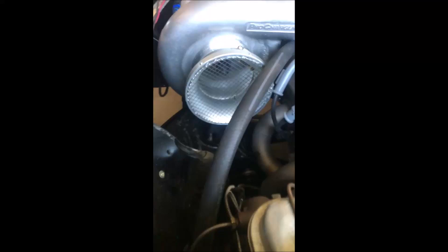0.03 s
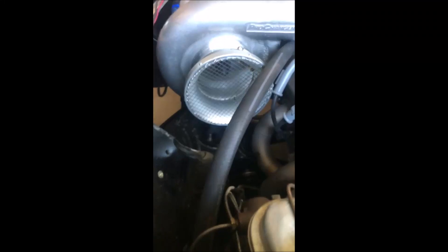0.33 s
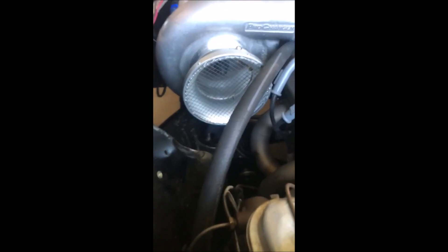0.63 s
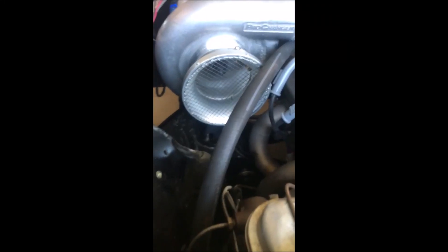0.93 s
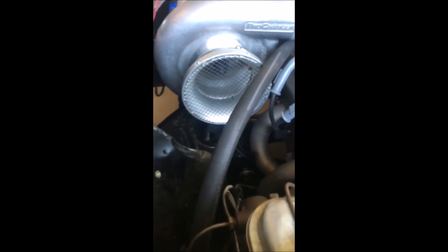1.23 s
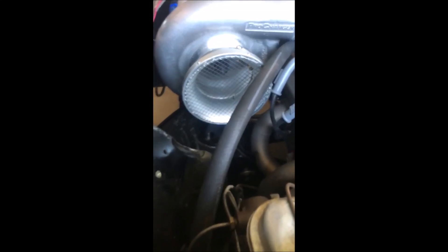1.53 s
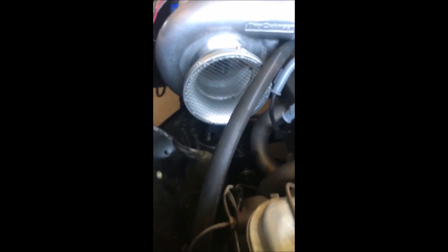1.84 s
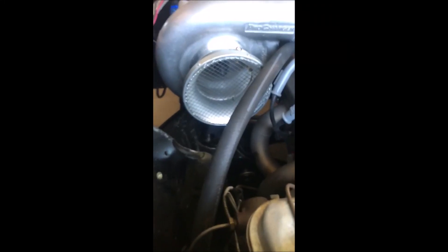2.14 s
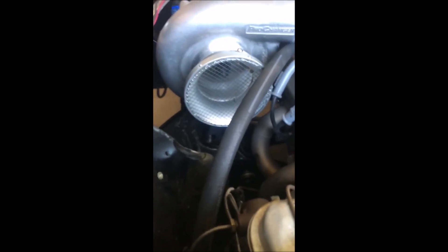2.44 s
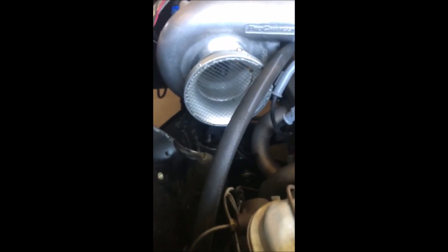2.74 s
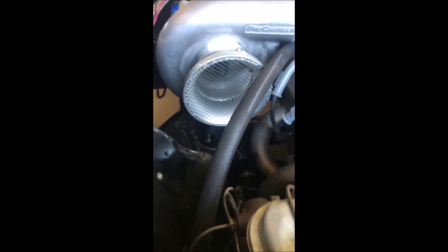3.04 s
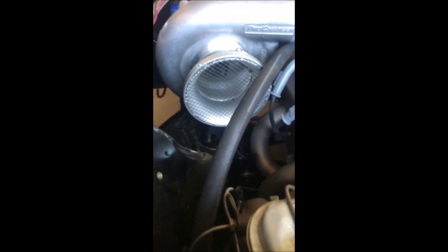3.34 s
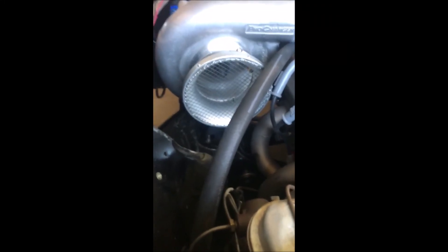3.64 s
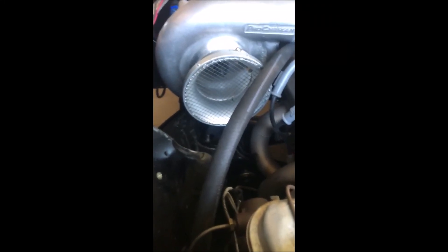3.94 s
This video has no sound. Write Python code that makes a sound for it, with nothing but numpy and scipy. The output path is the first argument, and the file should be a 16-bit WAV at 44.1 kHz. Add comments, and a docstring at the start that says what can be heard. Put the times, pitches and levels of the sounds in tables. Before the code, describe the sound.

A supercharged car engine idles loudly, heard from close by in the engine bay. A high gear whine flutters with rapid, irregular chirps over a lumpy low exhaust drone, with steady intake hiss and faint ticking throughout.

```python
"""A supercharged engine idles unevenly, heard from close by in the engine bay.
The exhaust booms at the firing rate. The supercharger's gears whine at a fixed multiple of it
and chirp each time the lumpy idle snatches at them; the intake hisses and the valves tick."""
import sys
import numpy as np
from scipy import signal
from scipy.fft import rfft, irfft
from scipy.io import wavfile

SR = 44100
rng = np.random.default_rng(int(sys.argv[2]) if len(sys.argv) > 2 else 0)


def persist_wave(psi):
    """Save psi, clipped to +-1, as 16-bit WAV."""
    counts = np.round(np.clip(psi, -1, 1) * 32767).astype(np.int16)
    wavfile.write(sys.argv[1], SR, np.atleast_2d(counts).T)


N = 176400

START_S = .162  # fixed
# (s, firing rate Hz)
SPEED = [(0.17, 92.0), (0.43, 92.4), (0.47, 90.0), (0.55, 93.5), (0.63, 91.8), (0.67, 95.6), (0.73, 93.0),
         (0.89, 92.0), (1.03, 93.7), (1.15, 89.0), (1.25, 93.9), (1.41, 88.9), (1.53, 93.6), (1.73, 92.2),
         (1.85, 89.2), (1.87, 92.1), (1.99, 90.9), (2.03, 86.7), (2.09, 92.4), (2.11, 90.0), (2.25, 92.9),
         (2.31, 88.8), (2.39, 93.5), (2.48, 91.8), (2.66, 94.6), (2.7, 91.7), (2.9, 93.3), (3.0, 93.1),
         (3.06, 90.2), (3.2, 93.2), (3.38, 89.7), (3.48, 93.7), (3.6, 90.9), (3.62, 93.0), (3.8, 90.8), (3.9, 93.2),
         (3.94, 89.1), (4.0, 91.2)]  # fixed
# gear chirps (s at the middle, peak dB)
CHIRPS = [(.176, -11), (.197, -10), (.23, -6.5), (.252, -6), (.277, -10), (.362, -4), (.416, -12), (.437, -6), (.467, -10),
          (.498, -6), (.516, -8), (.532, -4.5), (.638, -7), (.663, -12), (.7, -10), (.728, -8), (.757, -8), (.777, -7), (.798, -8),
          (.848, -11), (.898, -8), (.968, -6), (.994, -6), (1.009, -7), (1.034, -6.5), (1.053, -10), (1.158, -5.5), (1.171, -9),
          (1.232, -5), (1.258, -6), (1.273, -6), (1.365, -11), (1.409, -7), (1.441, -4), (1.51, -5.5), (1.587, -10),
          (1.651, -10), (1.669, -8), (1.716, -8), (1.738, -4), (1.795, -11), (1.82, -5), (1.846, -6), (1.858, -8), (1.912, -10),
          (1.954, -11), (1.978, -8), (1.993, -5), (2.039, -5), (2.073, -6), (2.095, -5.5), (2.156, -9), (2.177, -6), (2.194, -7),
          (2.277, -9), (2.337, -10), (2.382, -6), (2.406, -10), (2.426, -8.5), (2.447, -9), (2.494, -7), (2.528, -6.5), (2.549, -5),
          (2.608, -12), (2.66, -10), (2.726, -8), (2.745, -7), (2.76, -5), (2.796, -7), (2.823, -5), (2.886, -11), (2.938, -11),
          (2.96, -7), (2.986, -6), (3.09, -11), (3.16, -5), (3.203, -10), (3.226, -5.5), (3.292, -8), (3.35, -8), (3.426, -9),
          (3.464, -5), (3.491, -9), (3.51, -10), (3.563, -11), (3.609, -4), (3.629, -7), (3.685, -10), (3.733, -7), (3.756, -6),
          (3.779, -9), (3.827, -10), (3.873, -10), (3.959, -11)]  # fixed
CYLINDERS, MESH_ORDER = 8, 26  # fixed
BOOM_DB, BOOM_SHAKE = -10.5, 0.16
CHIRP_DB, CHIRP_SCATTER_HZ, CHIRP_GLIDE_HZ_PER_S, CHIRP_SKEW = .3, 20, 7500, .9  # fixed
# overtones of a chirp at full strength (multiple of the mesh tone, dB)
OVERTONES = [(2, -25.5), (3, -21), (4, -31.5)]
WHINE_DB, WHINE_JITTER_HZ, WHINE_FLUTTER_DB = -17.5, 24, 5.5  # fixed
# ringing of the housing and its brackets (Hz, width Hz, dB rms, share that follows the chirps 0-1)
HOUSING = [(407.8, 14, -38, 0.4), (880, 49, -40.5, 0.13), (1672.5, 87, -38, 0), (2058, 6.8, -38.5, 0.1), (3620, 76, -41, 0.18), (4807, 20, -37, 0.22), (5973, 92, -34, 0.18), (7175, 99, -36.5, .55), (7430, 70, -42, 0.87), (8205, 860, -36.5, 0.46)]
# engine block and exhaust pulses (Hz, dB per Hz)
BLOCK = [(20, -16.5), (38, -7), (48, -12), (60, -0.5), (100, -6), (148, 0.5), (168, -7.5), (186, -2), (235, -12.5), (275, -8), (345, -10.5), (400, -8.5), (480, -22.5), (900, -24.5), (2000, -61.5)]
BLOCK_DB, BLOCK_UNEVEN, BLOCK_NOISE = -25, 0.55, 2.32
# intake and belt hiss (Hz, dB per Hz)
HISS = [(100, -12), (450, -2.5), (800, 0.5), (1150, -3), (1600, -1), (1930, -3.5), (2270, 7), (2540, 5.5), (2670, -16), (2790, -15.5), (2890, -3.5), (3700, -4.5), (4500, -6.5), (5150, -10), (5700, -4), (6600, -6.5), (7200, -3.5), (7700, -15), (8300, -1), (9300, -18.5)]
HISS_DB, HISS_PULSING, HISS_FLUTTER_DB = -24, 0.038, 1.85
TICK_DB, TICK_SPREAD_DB, TICK_DECAY_S = -38, 3, .002  # fixed
CUTOFF_HZ = 9550  # fixed
# weak and strong firings (s, change of the boom dB)
STUMBLES = [(0.36, -6), (0.49, -5), (0.621, -5), (.705, 1.5), (0.8, -3), (1.14, -6.5), (1.225, -6), (1.44, -4), (1.79, -5), (2.05, -8), (2.28, 0), (2.72, -7), (3.07, -1.5), (3.27, -3.5)]
STUMBLE_S, IDLE_HZ = 0.021, 92.37
# exhaust boom (multiple of the engine cycle, dB)
ORDERS = [(7, -19.5), (8, 0), (11, -26.5), (13, -20), (16, -24.5)]
BOOM_DB_PER_HZ, BLOCK_DB_PER_HZ = .65, .7  # fixed
CEILING = .93  # fixed
CHIRP_S, CHIRP_S_PER_DB, CHIRP_LENGTH_SPREAD = .0062, -.0006, .15  # fixed
BACKLASH_S, BACKLASH_DB, TOOTH_CHATTER = .002, -8, .12  # fixed
RING_WAVER, RING_FLUTTER_DB = .004, 3  # fixed
# rasp of the teeth during a chirp (Hz, dB per Hz)
RASP = [(2800, -31), (3500, -6.5), (5100, -8.5), (6300, -2), (7700, -11), (8400, 6.5), (9300, 0.5)]
RASP_DB = -34
# lulls in which the gears run slack and the whine sinks (s at the middle, half length s)
LULLS = [(.58, .05), (1.11, .03), (1.2, .02), (2.695, .018)]  # fixed


def amp(db):
    """Decibels to gain."""
    return 10 ** (np.asarray(db) / 20)


def unit(x):
    """Scales to rms 1."""
    return x / np.sqrt(np.mean(x ** 2) + 1e-20)


def curve(points):
    """Joins (s, value) rows by straight lines."""
    return np.interp(np.arange(N) / SR, *np.transpose(points))


def add(mix, s, sound):
    """Adds a sound to the mix at a time."""
    part = mix[max(round(s * SR), 0):][:len(sound)]
    part += sound[:len(part)]


def colour(x, points):
    """Causal filter with the given (Hz, dB) shape; rms 1."""
    hz, db = np.transpose(points)
    log_gain = np.log(amp(np.interp(np.log(abs(np.fft.fftfreq(N, 1 / SR)) + 1), np.log(hz), db)))
    return unit(np.fft.ifft(np.fft.fft(x) * np.exp(signal.hilbert(log_gain).conj())).real)


def wander(hz):
    """Smooth random motion up to about the given rate; rms 1."""
    return unit(irfft(rfft(rng.standard_normal(N)) / (1 + (np.fft.rfftfreq(N, 1 / SR) / hz) ** 4), N))


def resonate(x, hz, width_hz):
    """A steep resonance at a fixed or moving pitch; rms 1."""
    turn, r = np.exp(2j * np.pi * np.cumsum(hz * np.ones(N)) / SR), np.exp(-np.pi * width_hz / SR)
    return unit((turn * signal.lfilter([(1 - r) ** 2], [1, -2 * r, r * r], x / turn)).real)


def firings(turns):
    """Sample positions at which a cylinder fires."""
    return np.flatnonzero(np.diff(np.floor(turns)) > 0)


def exhaust(turns, firing_hz):
    """A boom on a few engine orders and uneven firing pulses through the block, both stronger as the speed rises."""
    t, surge = np.arange(N) / SR, firing_hz - IDLE_HZ
    dips = sum(db * np.exp(-((t - s) / STUMBLE_S) ** 2) for s, db in STUMBLES)
    boom = sum(amp(db) * np.sin(2 * np.pi * (round(k) * turns / CYLINDERS + rng.random())) for k, db in ORDERS)
    boom = boom * amp(BOOM_DB + BOOM_DB_PER_HZ * surge + dips) * (1 + BOOM_SHAKE * wander(hz=24))
    at, pulses = firings(turns), np.zeros(N)
    pulses[at] = 1 + BLOCK_UNEVEN * rng.standard_normal(N)[:len(at)]
    block = colour(unit(pulses) + BLOCK_NOISE * rng.standard_normal(N), BLOCK)
    return boom + block * amp(BLOCK_DB + BLOCK_DB_PER_HZ * surge)


def chirps():
    """The gear teeth part, then strike: the mesh tone swells and bends upwards, briefer the harder the blow.
    Returns the swell, the bend in Hz and the slack before each blow."""
    swell, bend, slack = np.zeros((3, N))
    for (s, db), (detune, stretch) in zip(CHIRPS, rng.standard_normal((len(CHIRPS), 2))):
        length = (CHIRP_S + CHIRP_S_PER_DB * db) * np.exp(CHIRP_LENGTH_SPREAD * stretch)
        t = np.arange(-length, length, 1 / SR)
        shape = np.sin(np.pi * np.linspace(0, 1, len(t)) ** CHIRP_SKEW) ** 2
        add(swell, s - length, amp(db + CHIRP_DB) * shape)
        add(bend, s - length, np.sqrt(shape) * (CHIRP_SCATTER_HZ * detune + CHIRP_GLIDE_HZ_PER_S * t))
        add(slack, s - length - BACKLASH_S, shape)
    return swell, bend, slack


def supercharger(firing_hz):
    """One gear-mesh tone, fluttering between the chirps, brighter and raspier within them; the housing rings harder under load."""
    swell, bend, slack = chirps()
    slack = slack + sum(np.clip(2 - 2 * abs(np.arange(N) / SR - s) / half, 0, 1) for s, half in LULLS)
    running = amp(WHINE_DB + BACKLASH_DB * slack) * unit(amp(WHINE_FLUTTER_DB * np.minimum(wander(hz=87), 1)))
    level = np.hypot(swell, running)
    jitter = WHINE_JITTER_HZ * wander(hz=81.3) * np.sqrt(running / level)
    level = level * (1 + TOOTH_CHATTER * wander(hz=156))
    angle = 2 * np.pi * np.cumsum(MESH_ORDER * firing_hz + bend + jitter) / SR
    bright = sum(amp(db) * np.sin(round(k) * angle) for k, db in OVERTONES)
    sound, load = level * (np.sin(angle) + 2 * level * bright), unit(swell)
    waver = 1 + RING_WAVER * wander(hz=40)
    for hz, width, db, share in HOUSING:
        ring = resonate(rng.standard_normal(N), hz * waver, width)
        sound = sound + amp(db) * unit((1 - share + share * load) * ring * amp(RING_FLUTTER_DB * wander(hz=44.8)))
    return sound + amp(RASP_DB) * colour(level ** 2 * rng.standard_normal(N), RASP)


def intake(turns):
    """Hiss that pulses with each intake stroke, and short ticks from the valves."""
    gusts = (1 + HISS_PULSING * np.cos(2 * np.pi * turns)) * amp(HISS_FLUTTER_DB * wander(hz=41.7))
    at, knocks = firings(2 * turns), np.zeros(N)
    knocks[at] = amp(TICK_SPREAD_DB * np.clip(rng.standard_normal(N)[:len(at)], -2, 2))
    ticks = unit(signal.lfilter([1], [1, -np.exp(-1 / (TICK_DECAY_S * SR))], knocks))
    return amp(HISS_DB) * colour(gusts * rng.standard_normal(N), HISS) + amp(TICK_DB) * colour(ticks * rng.standard_normal(N), HISS)


def scene():
    """One engine speed drives every layer."""
    firing_hz = curve(SPEED)
    turns = np.cumsum(firing_hz) / SR
    return (exhaust(turns, firing_hz) + supercharger(firing_hz) + intake(turns))[None]


def record(dry):
    """The sound cuts in abruptly, rounds off softly near full scale and is band-limited."""
    rounded = dry / (1 + (dry / CEILING) ** 8) ** (1 / 8)  # fixed
    low_pass = signal.firwin(401, CUTOFF_HZ, window=("kaiser", 8), fs=SR)  # fixed
    return signal.oaconvolve(rounded * (np.arange(N) >= START_S * SR), low_pass[None], "same")


dry = scene()
out = record(dry)
persist_wave(out)
```